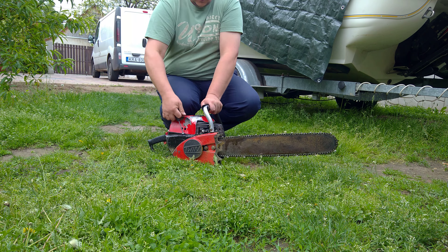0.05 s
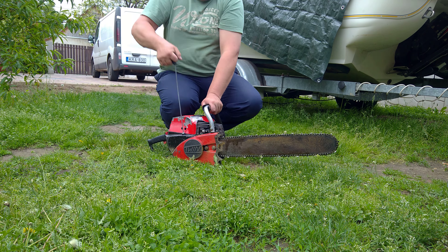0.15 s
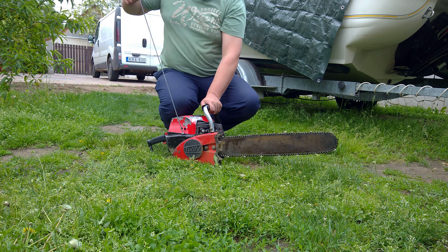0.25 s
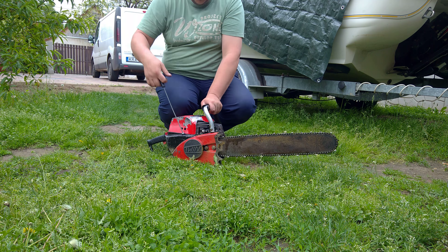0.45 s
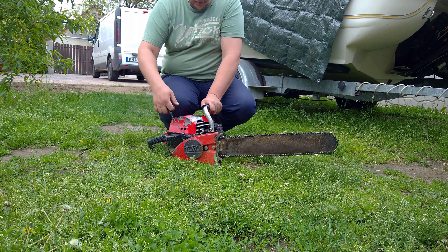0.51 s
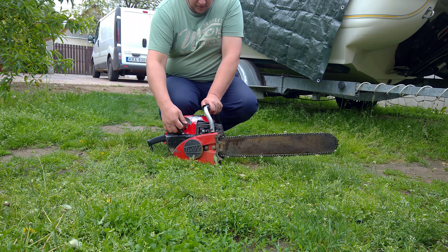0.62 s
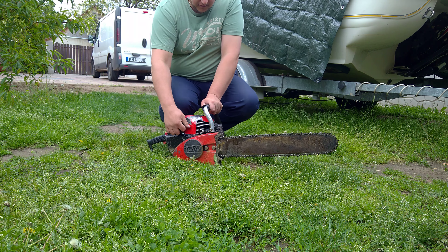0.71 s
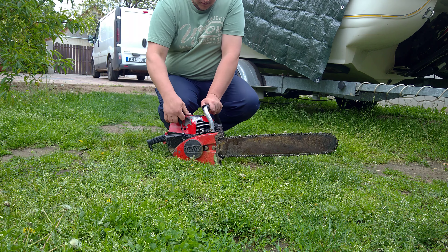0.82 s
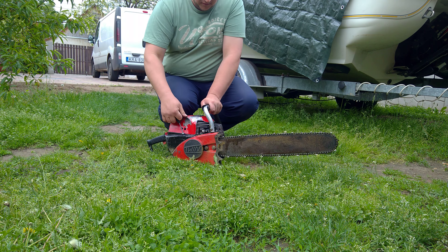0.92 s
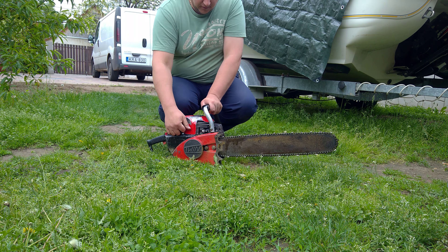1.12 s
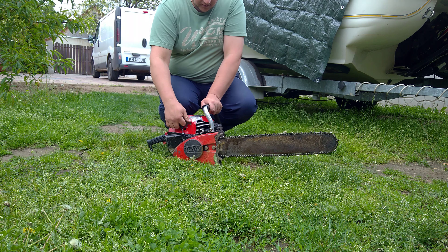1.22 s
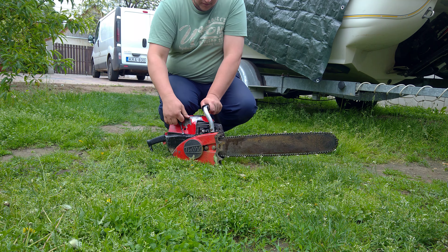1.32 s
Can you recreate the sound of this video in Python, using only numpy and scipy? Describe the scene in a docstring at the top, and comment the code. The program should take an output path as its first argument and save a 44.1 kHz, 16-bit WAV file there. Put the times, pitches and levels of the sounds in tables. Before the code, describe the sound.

A chainsaw is pull-started in a garden but does not catch. A faint bird chirps at 0 s over low hum. From 0.2 to 0.4 s rapid popping puffs chug with a gritty starter whirr, brief squeaks and metallic clacks, weakening by 0.55 s. The cord rewinds; the bird calls again at 0.8 s, the handle snaps home at 0.9 s, then light knocks around 1.1 s. Close, louder and brighter left.

```python
"""A small bird whistles over a low hum; then one cord pull cranks a two-stroke chainsaw, which does not catch.
Each turn pops at the intake and puffs through the muffler, as decaying sines with a noise rasp.
The starter whirrs on random grit with short sine squeaks; knocks and the scraping cord ring sets of modes.
The cord winds back as the bird calls a second time; then its handle snaps home and settles with light bounces.
Decaying noise gives the garden echoes; the right port, facing away from the saw, hears it later and duller."""
import sys
import numpy as np
from scipy import signal
from scipy.fft import rfft, irfft
from scipy.io import wavfile
from scipy.ndimage import uniform_filter1d

SR = 44100
rng = np.random.default_rng(int(sys.argv[2]) if len(sys.argv) > 2 else 0)


def generate_wav(sig):
    """Save sig (samples, or channels by samples) to the path in sys.argv[1] as 16-bit PCM at SR."""
    pcm = np.round(np.clip(np.atleast_2d(sig).T, -1, 1) * 32767).astype(np.int16)
    wavfile.write(sys.argv[1], SR, pcm)


N = 59535  # length in samples, 1.35 s


def undb(db):
    """Decibels to gain."""
    return 10 ** (np.asarray(db) / 20)


def unit(x):
    """Scale to rms 1."""
    return x / np.sqrt(np.mean(x ** 2) + 1e-20)


def clock(start=0):
    """Seconds since start, zero before it."""
    return np.maximum(np.arange(N) / SR - start, 0)


def sine(hz, t):
    """A sine that starts at zero phase."""
    return np.sin(2 * np.pi * hz * t)


def gains(points):
    """Gain at each bin of a double-length spectrum, drawn through (Hz, dB) points over log frequency."""
    hz, db = np.array(points).T
    bins_hz = np.fft.rfftfreq(2 * N, 1 / SR)
    return undb(np.interp(np.log(bins_hz + 1), np.log(hz), db))


def convolve(x, response):
    """Play x through a response scaled to unit energy."""
    return signal.fftconvolve(x, response / np.linalg.norm(response))[:N]


def colour(x, points):
    """Minimum-phase filter through (Hz, dB) points; keeps the power of white noise."""
    # folding the cepstrum makes the response causal
    cepstrum = irfft(np.log(gains(points)))
    cepstrum[1:N] *= 2
    cepstrum[N + 1:] = 0
    response = irfft(np.exp(rfft(cepstrum)))[:N]
    return convolve(x, response)


def low_cut(x, hz, order):
    """Remove the sound below hz."""
    return signal.sosfilt(signal.butter(order, hz, "high", fs=SR, output="sos"), x)


def struck(modes, start=0):
    """A set of decaying modes after one blow."""
    t = clock(start)
    return sum(undb(db - 60 * t / t60) * sine(hz, t) for hz, db, t60 in modes)


def ring(x, modes):
    """Excite a set of decaying modes with x."""
    return convolve(x, struck(modes))


GRAINS_PER_S, GRAIN_SPREAD_DB = 1100, 1
SMOOTH_DB = -3  # steady noise against the grains


def grit():
    """Dense tiny contacts of uneven size, blurred by noise into a rasp of rms 1."""
    hits = rng.random(N) < GRAINS_PER_S / SR
    size = undb(GRAIN_SPREAD_DB * np.minimum(rng.exponential(size=N), 4))
    grains = unit(hits * size * rng.choice([-1, 1], N))
    return unit(grains + undb(SMOOTH_DB) * rng.standard_normal(N))


def echoes(x, t60):
    """Diffuse echoes from fence, van and walls: noise that swells in quickly and dies away."""
    t = clock()
    decay = np.exp(-np.log(1000) * t / t60)
    swell = 1 - np.exp(-t / 0.0042)
    return convolve(x, rng.standard_normal(N) * decay * swell)


# spectrum of the outdoor air: freq_hz [Hz], density_db [dB per Hz, relative]
AIR_COLOUR = [(130, -1.5), (300, -8.5), (750, -9), (1300, -26.5), (2500, -31.5), (6000, -32), (9000, -40.5),
              (15500, -45.5)]
HUM_HZ = 41.1
HUM_DB, AIR_DB = (-68, -42.5), (-62, -52.5)  # rms level at left, right


def background():
    """A steady low hum and faint outdoor air, both stronger on the right."""
    hum = np.outer(undb(HUM_DB), np.sqrt(2) * sine(HUM_HZ, clock()))
    air = [undb(db) * colour(rng.standard_normal(N), AIR_COLOUR) for db in AIR_DB]
    return hum + np.array(air)


# bird calls: start_s [s], call_db [dB], direct_db [dB, dry sound], far_db [dB, far wall against direct]
BIRD_CALLS = [(-.016, -47, -13.5, -24), (0.792, -47, -7.5, -2)]
# shape shared by the calls: into_call_s [s], pitch_hz [Hz], level_db [dB against call_db]
CALL_SHAPE = [(0, 3500, -10), (.013, 5250, -1), (.034, 5050, -1), (.044, 3850, -3), (.05, 4300, -2),
              (.056, 3400, -3), (.068, 3500, -5), (.073, 4350, -2), (.081, 3300, -5), (.092, 3650, 0),
              (.118, 3200, -18)]
BIRD_WAVER = 0.026  # rms pitch waver as a fraction
NEAR_WALL_S, NEAR_WALL_DB = 0.044, -3
FAR_WALL_S, FAR_WALL_LOW_HZ = 0.137, 5200
BIRD_T60_S, BIRD_WET_DB = 0.27, -4.5


def bird():
    """A high whistle that falls in a fast zigzag, far off, repeated by two walls and smeared by echoes."""
    shape_s, shape_hz, shape_db = np.array(CALL_SHAPE).T
    t, out = clock(), np.zeros(N)
    waver = 1 + BIRD_WAVER * unit(uniform_filter1d(rng.standard_normal(N), size=60))
    for start, call_db, direct_db, far_db in BIRD_CALLS:
        pitch_hz = np.interp(t - start, shape_s, shape_hz) * waver
        envelope = np.interp(t - start, shape_s, undb(shape_db), left=0, right=0)
        call = undb(call_db) * envelope * np.sin(2 * np.pi * np.cumsum(pitch_hz) / SR)
        near = np.interp(t - NEAR_WALL_S, t, call, left=0)
        far = np.interp(t - FAR_WALL_S, t, call, left=0)
        call = call + undb(NEAR_WALL_DB) * near
        # only the top of the call returns from the far wall
        far = low_cut(far, FAR_WALL_LOW_HZ, order=4)
        out += undb(direct_db) * (call + undb(far_db) * far)
        out += undb(BIRD_WET_DB) * echoes(call, BIRD_T60_S)
    return 2 * out  # the whole bird is 6 dB above its table levels


# drag of the last of the cord: time_s [s], level_db [dB]
SCRAPE = [(.779, -72), (.784, -41), (.795, -41), (0.802, -44.5), (.825, -76)]
# what the cord's eye rings with: freq_hz [Hz], level_db [dB], t60_s [s]
SCRAPE_MODES = [(580, -0.5, 0.022), (880, -0.5, 0.012), (1300, 1, 0.019), (1710, 0.5, 0.02),
                (2250, -6, .02), (2620, -4, .02)]


def scrape():
    """The cord drags softly in through its eye: grit exciting short modes."""
    level_db = np.interp(clock(), *np.array(SCRAPE).T, left=-np.inf, right=-np.inf)
    return ring(undb(level_db) * grit(), SCRAPE_MODES)


# hard ping of the cord handle: freq_hz [Hz], level_db [dB]
SNAP_MODES = [(2880, 6), (3170, -5)]
SNAP_S, SNAP_DB, SNAP_DECAY_S = 0.8902, -25.5, 0.0039


def snap():
    """The cord handle snaps home against the starter cover: two sines in one short decay."""
    t = clock(SNAP_S)
    ping = sum(undb(db) * sine(hz, t) for hz, db in SNAP_MODES)
    return undb(SNAP_DB) * np.exp(-t / SNAP_DECAY_S) * ping


# bounces of the handle in its seat: start_s [s], thud_db [dB], ring_db [dB]
HANDLE_TAPS = [(1.1462, -27, -54), (1.1502, -31.5, -45), (1.1542, -38, -40.5)]
# low thud of the hollow handle: freq_hz [Hz], level_db [dB], t60_s [s]
HANDLE_THUD = [(502, 1, 0.03), (726, -4, 0.019), (823, -1, 0.035), (1107, -7, .028)]
# its high ring: freq_hz [Hz], level_db [dB], t60_s [s]
HANDLE_RING = [(1465, -0.5, 0.037), (2240, -5, 0.032), (2816, 1.5, .045), (2985, -1, 0.036)]
BODY_LOW_HZ = 380  # low cut of handle and knocks


def handle():
    """The released handle knocks into its seat: a hollow thud, then lighter bounces that ring."""
    out = np.zeros(N)
    for start, thud_db, ring_db in HANDLE_TAPS:
        out += undb(thud_db) * struck(HANDLE_THUD, start)
        out += undb(ring_db) * struck(HANDLE_RING, start)
    return low_cut(out, BODY_LOW_HZ, order=4)


# clacks of pawls, handle and housing, levels before each layer's trim:
# start_s [s], body_db [dB], clack_db [dB], tick_db [dB], rattle_decay_s [s], blow_hz [Hz, centre of the blow]
KNOCKS = [(.116, -39.5, -44.5, -52.5, 0.0066, 1030), (0.165, -45, -43, -38.5, 0.0043, 930),
          (0.2106, -22, -27.5, -27, 0.0086, 830), (0.2627, -18.5, -27.5, -29.5, 0.0038, 910),
          (0.272, -37, -24.5, -22.5, 0.0014, 850), (.3145, -17, -25.5, -26, 0.0062, 876),
          (0.349, -45, -28, -24, 0.0052, 810), (0.388, -22, -22, -22.5, 0.0027, 796),
          (0.4313, -50, -27, -34, 0.013, 790), (0.4619, -33, -30, -43, 0.0081, 900),
          (0.4898, -27.5, -26.5, -27.5, 0.0052, 596), (.545, -27, -32.5, -42, 0.0042, 810),
          (.567, -32.5, -32.5, -45, 0.0045, 840), (0.602, -33, -29.5, -33, 0.0065, 830),
          (0.642, -57, -45, -49, .005, 900), (0.6499, -49, -34, -33, 0.0095, 902),
          (0.677, -64, -29.5, -39, 0.0069, 890), (0.726, -35.5, -45.5, -46, 0.0048, 855),
          (0.7376, -22.5, -30, -41.5, 0.0074, 716), (0.867, -49.5, -50, -43.5, 0.013, 885),
          (.890, -27.5, -30, -30.5, 0.0099, 540), (0.8979, -22, -30.5, -57, 0.0085, 650),
          (1.071, -40, -37, -34, 0.005, 1210), (1.087, -38.5, -39, -41, 0.0062, 790),
          (1.1335, -48, -56, -46.5, 0.017, 780), (1.151, -43, -39.5, -49, 0.0058, 776),
          (1.294, -54.5, -53, -50.5, 0.017, 830)]
# low ring of the housing: freq_hz [Hz], level_db [dB], t60_s [s]
BODY_MODES = [(480, 12.5, 0.035), (533, -3.5, 0.034), (680, 4.5, 0.017), (846, -3.5, 0.02),
              (906, -2.5, 0.028), (1070, -6.5, 0.037)]
# bright ring of the clack: freq_hz [Hz], level_db [dB], t60_s [s]
CLACK_MODES = [(1400, 7.5, 0.023), (1620, 3, 0.044), (2610, 14, 0.009), (2870, 5.6, 0.074)]
# spectrum of the clack's noise: freq_hz [Hz], density_db [dB per Hz, relative]
CLACK_COLOUR = [(300, -13), (900, -0.5), (1400, 0), (3000, -3.5), (4200, -1.5), (9000, -51.5)]
# spectrum of the bright tick: freq_hz [Hz], density_db [dB per Hz, relative]
TICK_COLOUR = [(1500, -25), (3600, 9), (5000, 5.5), (7000, -1.5), (10000, -9.5), (15500, -21.5)]
BLOW_DB, BLOW_Q, RATTLE_DB = -8, 2.4, -1.5
BODY_DB, CLACK_RING_DB, CLACK_NOISE_DB = -4, -9.5, -1.5  # layer trims


def knocks():
    """A blow and a short rattle ring the housing, lower or higher by where they land, with a bright tick."""
    body, clack, tick = np.zeros((3, N))
    chatter = grit()
    for start, body_db, clack_db, tick_db, decay, blow_hz in KNOCKS:
        t = clock(start)
        # longer rattles carry more energy
        rattle = unit(chatter * (t > 0) * np.exp(-t / decay)) * np.sqrt(decay * SR / N / 2)
        blow = undb(RATTLE_DB) * rattle
        blow[int(start * SR)] += undb(BLOW_DB) * np.sqrt(decay * SR)
        focused = signal.lfilter(*signal.iirpeak(blow_hz, BLOW_Q, fs=SR), blow)
        thud = unit(ring(focused, BODY_MODES))
        body += undb(body_db + BODY_DB) * thud * np.sqrt(decay * SR / N)
        clack += undb(clack_db) * rattle
        tick += undb(tick_db) * rattle
    out = body + undb(CLACK_RING_DB) * ring(clack, CLACK_MODES)
    out += undb(CLACK_NOISE_DB) * colour(clack, CLACK_COLOUR)
    out += colour(tick, TICK_COLOUR)
    return low_cut(out, BODY_LOW_HZ, order=4)


# turns of the crank, played by the engine and easing the starter:
# pop_s [s, intake], pop_db [dB], puff_s [s, exhaust], puff_db [dB], rasp_db [dB, before doubling]
TURNS = [(0.2026, -11.5, .2132, -10, -22), (0.2364, -8, .2440, -7.5, -21.5),
         (0.2653, -10, .2714, -7.5, -19.5), (0.2896, -10, .2966, -10, -27),
         (0.3162, -9, .3234, -8.5, -20.5), (.3440, -7, .3526, -9.5, -39), (0.3787, -10, .3891, -9.5, -25.5),
         (0.424, -15, .4413, -14, -23), (0.487, -23, .4960, -25.5, -26), (0.538, -27, .5638, -32.5, -55)]
# whirr of starter, cord and flywheel: time_s [s], level_db [dB, before flutter, lulls and low cut]
WHIRR = [(0, -68.5), (0.174, -50), (0.189, -38.5), (0.209, -29.5), (.26, -24), (0.328, -24), (.385, -32),
         (.412, -34), (.445, -32.5), (0.477, -35), (.505, -29), (.56, -40), (.645, -40.5), (0.672, -34),
         (0.699, -48), (.77, -52.5), (.95, -52), (1.05, -60.5), (1.13, -46.5), (1.21, -68.5)]
# spectrum of the whirr, shared by the exhaust rasp: freq_hz [Hz], density_db [dB per Hz, relative]
WHIRR_COLOUR = [(60, 1.5), (150, 12), (290, -5), (450, 7), (600, -3), (860, 0), (1150, -11), (1430, 0),
                (1750, -9.5), (2600, -6.5), (3500, -11.5), (5000, -15), (7000, -18.5), (10000, -25.5),
                (15500, -32.5)]
# the starter sings under the pull: start_s [s], pitch_hz [Hz], level_db [dB], length_s [s]
SQUEAKS = [(.193, 940, -28.5, 0.014), (0.2577, 870, -26, 0.019), (.259, 4960, -27.5, 0.013),
           (.3135, 867, -23, 0.014)]
FLUTTER_DB, WHIRR_LOW_HZ = 2.0, 200  # rms level flutter, low cut
LULL_DB, LULL_AFTER_S, LULL_WIDTH_S = -4, 0.016, 0.004  # level dip after each puff


def starter():
    """Cord and pulley rattle out, slackening after each puff, and wind back, with short squeaks under load."""
    flutter_db = FLUTTER_DB * unit(uniform_filter1d(rng.standard_normal(N), size=260))
    lull_db = np.zeros(N)
    for _, _, puff_s, _, _ in TURNS:
        lull_db += LULL_DB * np.exp(-((clock() - puff_s - LULL_AFTER_S) / LULL_WIDTH_S) ** 2)
    level_db = np.interp(clock(), *np.array(WHIRR).T) + flutter_db + lull_db
    out = colour(undb(level_db) * grit(), WHIRR_COLOUR)
    out = low_cut(out, WHIRR_LOW_HZ, order=2)
    for start, pitch_hz, db, length in SQUEAKS:
        t = clock(start)
        envelope = np.sin(np.pi * np.minimum(t / length, 1)) ** 2
        out += undb(db) * envelope * sine(pitch_hz, t)
    return out


INTAKE_HZ, INTAKE_DECAY_S, INTAKE_RISE_S = 435, 0.0055, 0.00065  # pitch at the first turn
INTAKE_SAG_HZ_PER_S = 340  # the pops deepen as the crank runs down
MUFFLER_HZ, MUFFLER_SWELL_S, MUFFLER_SHAPE = 167.1, 0.00544, 4.15
# suck and thump levels are against the puff
SUCK_DB, SUCK_AT_S, SUCK_WIDTH_S = -0.5, 0.0017, 0.00065
THUMP_HZ, THUMP_DECAY_S, THUMP_DB = 72, 0.01, -10.5
RASP_RISE_S, RASP_DECAY_S = 0.0047, 0.0075
PUFF_LOW_HZ = 32.4


def engine():
    """Each turn rings the intake; then the exhaust port opens with a suck, a puff and a rasp of gas."""
    out, gas = np.zeros(N), np.zeros(N)
    for pop_s, pop_db, puff_s, puff_db, rasp_db in TURNS:
        t = clock(pop_s)
        intake_hz = INTAKE_HZ - INTAKE_SAG_HZ_PER_S * (pop_s - TURNS[0][0])
        envelope = np.exp(-t / INTAKE_DECAY_S) * (1 - np.exp(-t / INTAKE_RISE_S))
        out -= undb(pop_db) * sine(intake_hz, t) * envelope

        t = clock(puff_s)
        swell = (t / MUFFLER_SWELL_S * np.exp(1 - t / MUFFLER_SWELL_S)) ** MUFFLER_SHAPE
        puff = swell * sine(MUFFLER_HZ, t)
        suck = undb(SUCK_DB) * np.exp(-((clock() - puff_s - SUCK_AT_S) / SUCK_WIDTH_S) ** 2)
        thump = undb(THUMP_DB) * sine(THUMP_HZ, t) * np.exp(-t / THUMP_DECAY_S)
        out += undb(puff_db) * (thump - suck - puff)
        gas += undb(rasp_db) * 2 * (1 - np.exp(-t / RASP_RISE_S)) * np.exp(-t / RASP_DECAY_S)
    out = low_cut(out, PUFF_LOW_HZ, order=1)
    return out + colour(gas * grit(), WHIRR_COLOUR)


# shading of the right port: freq_hz [Hz], gain_db [dB against the left]
FAR_PORT = [(60, -1.5), (180, -7.5), (400, -3.5), (560, -12), (720, 2), (1100, 4), (1450, -23),
            (1900, -22.5), (2700, -4), (3500, -27.5), (5000, -25), (8000, -39), (15000, -47)]
# its lateness: freq_hz [Hz], phase_lag_rad [radians]
FAR_LAG = [(0, 0), (800, 6.2), (1300, 8.2), (2000, 12.5), (3100, 14.6), (5000, 21.7), (7000, 23.2),
           (22050, 32)]


def far_port(x):
    """The right port faces away from the saw and hears things later and duller."""
    lag = np.interp(np.fft.rfftfreq(2 * N, 1 / SR), *np.array(FAR_LAG).T)
    return irfft(rfft(x, 2 * N) * gains(FAR_PORT) * np.exp(-1j * lag))[:N]


# boom of the puffs in the yard: freq_hz [Hz], gain_db [dB]
BOOM_COLOUR = [(40, -18.5), (95, 11), (145, 0), (230, -13.5), (1500, -38)]
# rattle scattered by nearby things: freq_hz [Hz], density_db [dB per Hz, relative]
SCATTER_COLOUR = [(400, -27), (1200, 12), (2800, 6), (3800, -15), (7000, -32), (15000, -37)]
BOOM_T60_S, BOOM_DB = 0.76, -10
GARDEN_T60_S, GARDEN_DB = 0.22, -16.5
SCATTER_T60_S, SCATTER_DB = 0.03, -22.5


def scene():
    """Saw and bird at both ports; puffs boom in the yard, nearby things scatter rattle to the right."""
    puffs = engine()
    rattles = starter() + knocks() + snap() + scrape() + handle()
    direct = puffs + rattles + bird()
    low_puffs = irfft(rfft(puffs, 2 * N) * gains(BOOM_COLOUR))[:N]
    boom = undb(BOOM_DB) * echoes(low_puffs, BOOM_T60_S)
    # each port gets its own garden echoes
    left = direct + boom + undb(GARDEN_DB) * echoes(rattles, GARDEN_T60_S)
    right = direct + boom + undb(GARDEN_DB) * echoes(rattles, GARDEN_T60_S)
    scatter = undb(SCATTER_DB) * colour(echoes(rattles, SCATTER_T60_S), SCATTER_COLOUR)
    return np.array([left, far_port(right) + scatter]) + background()


TOP_HZ = 15900


def record(dry):
    """A steep elliptic low-pass cuts the top."""
    return signal.sosfilt(signal.ellip(10, 0.1, 80, TOP_HZ, fs=SR, output="sos"), dry)


dry = scene()
out = record(dry)
generate_wav(out)
```